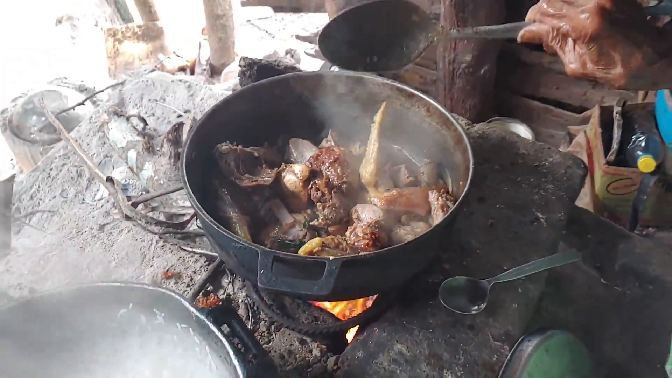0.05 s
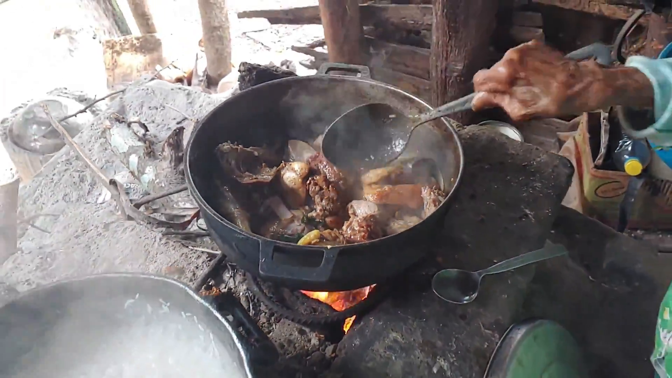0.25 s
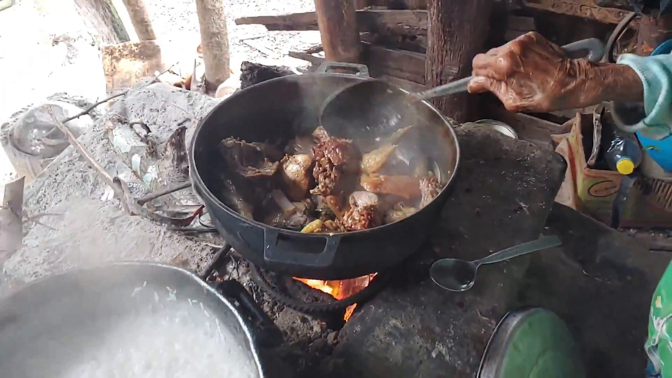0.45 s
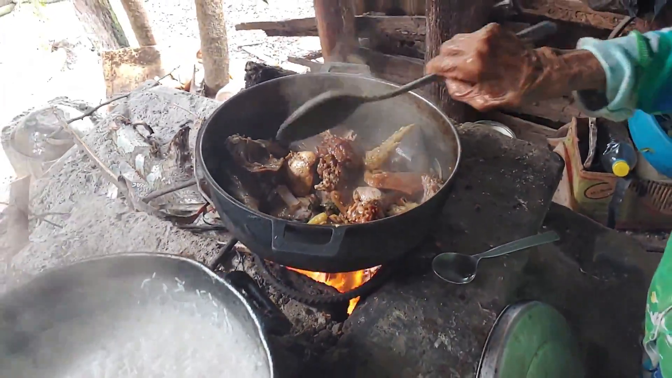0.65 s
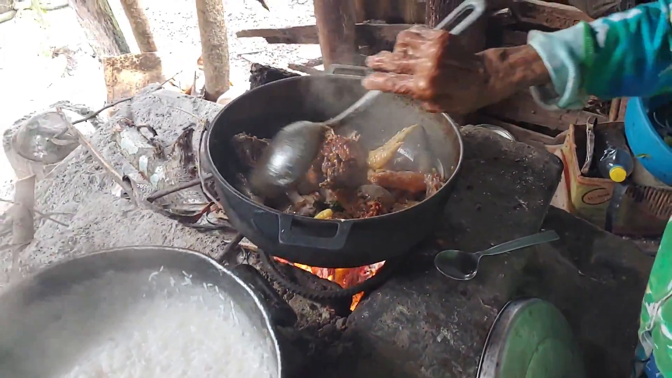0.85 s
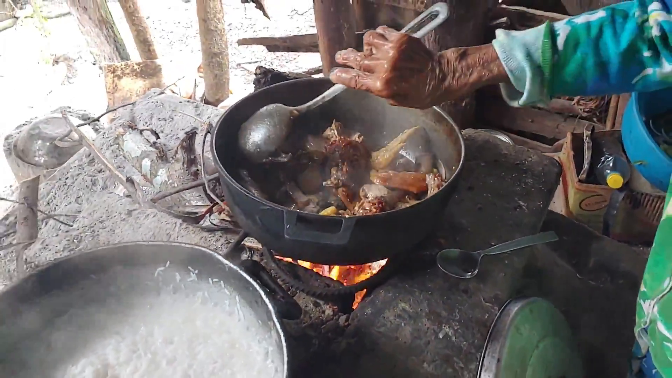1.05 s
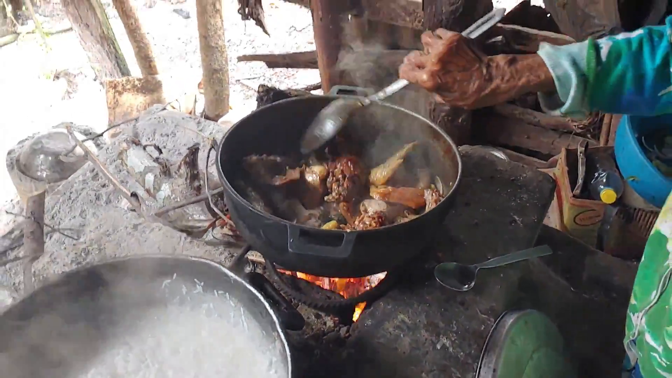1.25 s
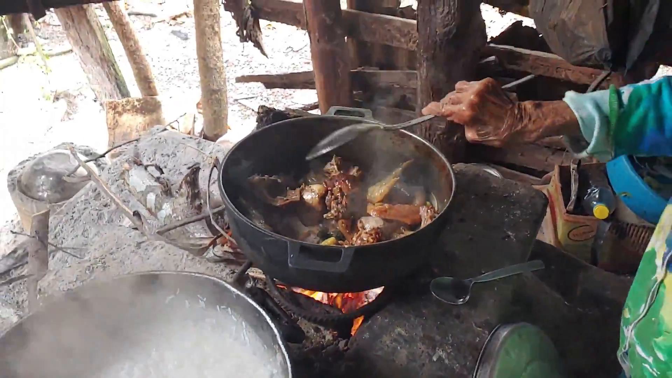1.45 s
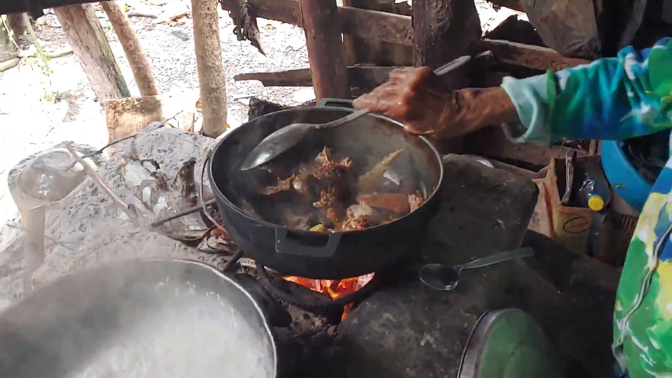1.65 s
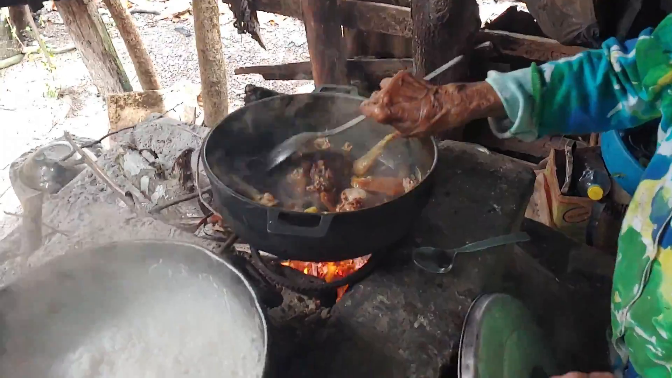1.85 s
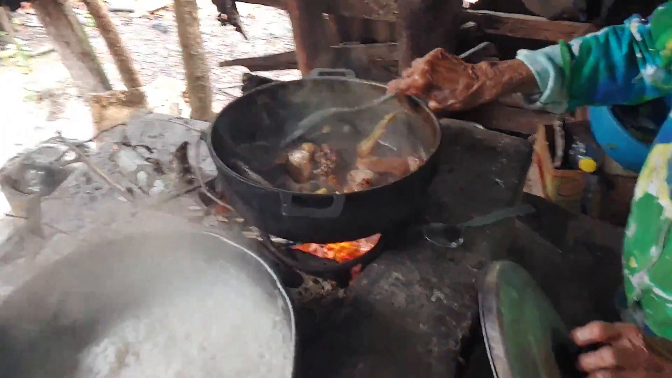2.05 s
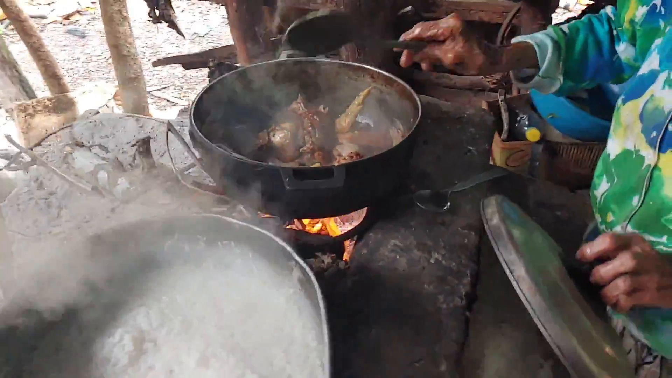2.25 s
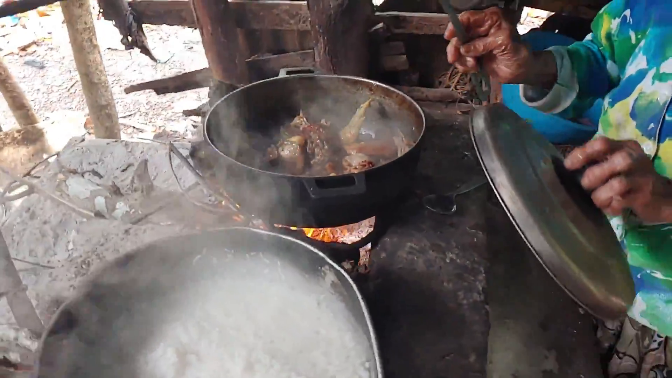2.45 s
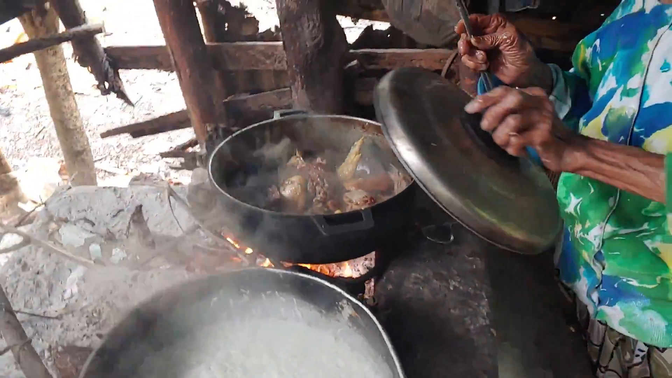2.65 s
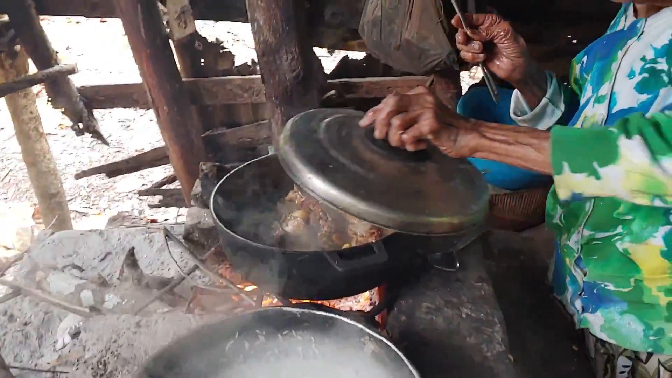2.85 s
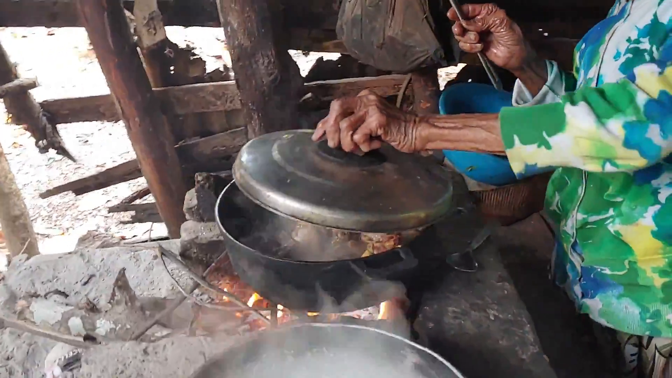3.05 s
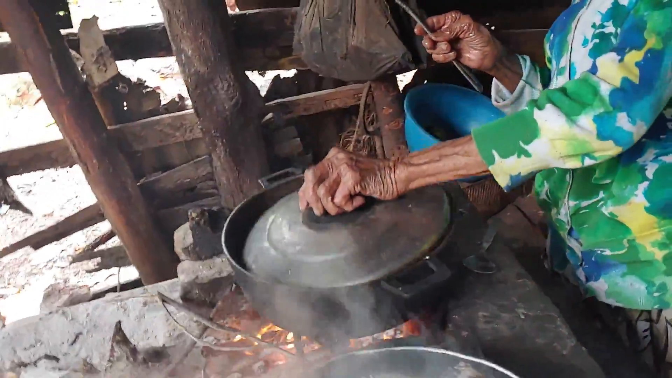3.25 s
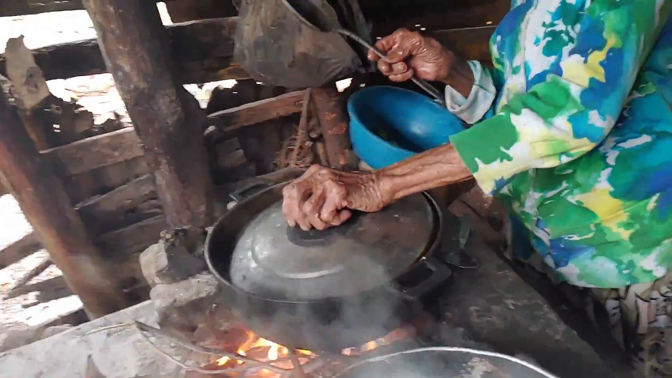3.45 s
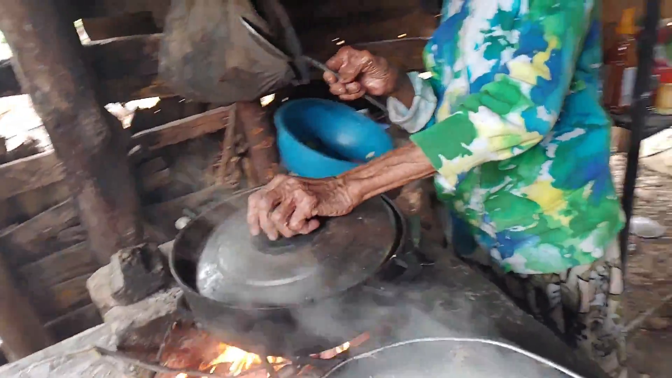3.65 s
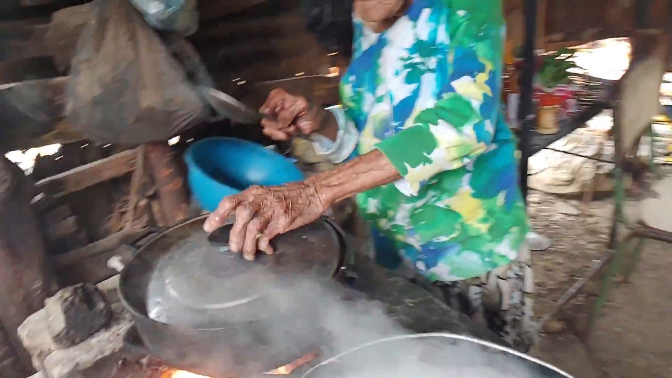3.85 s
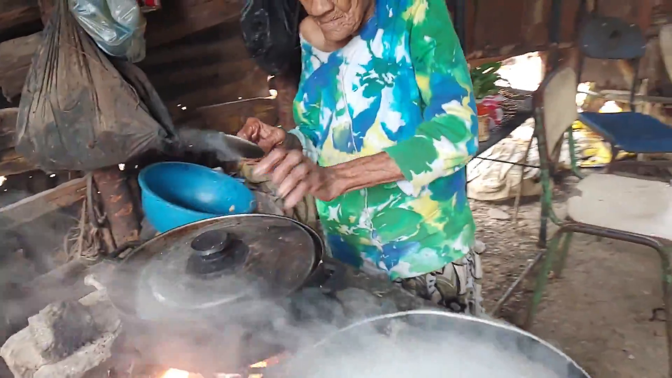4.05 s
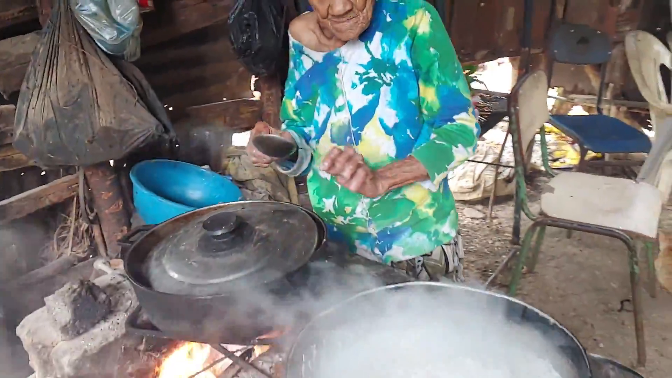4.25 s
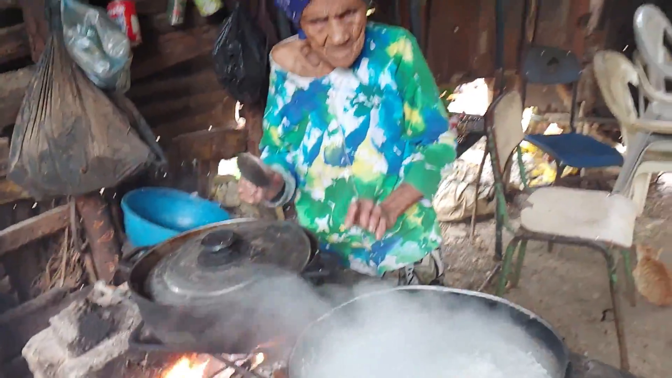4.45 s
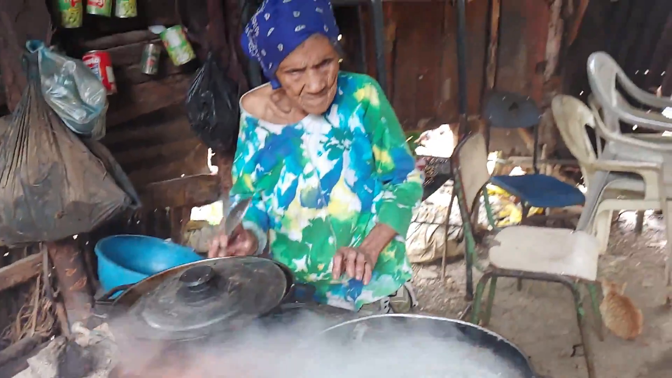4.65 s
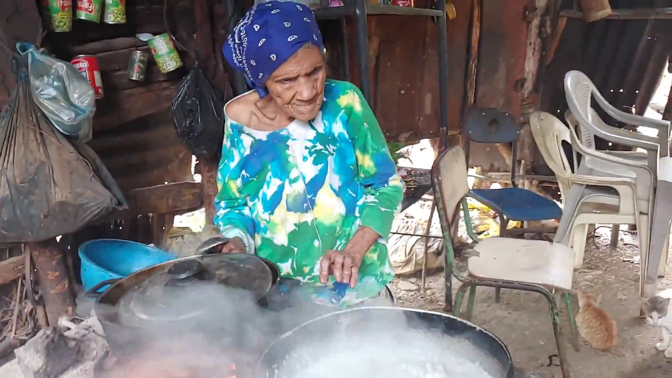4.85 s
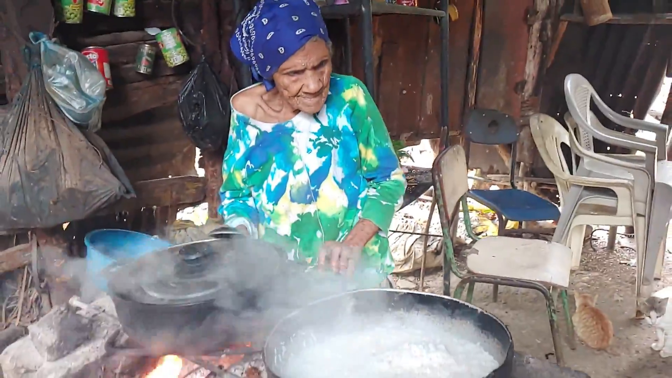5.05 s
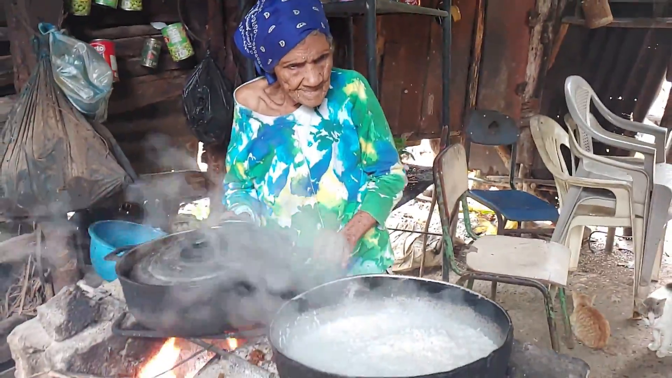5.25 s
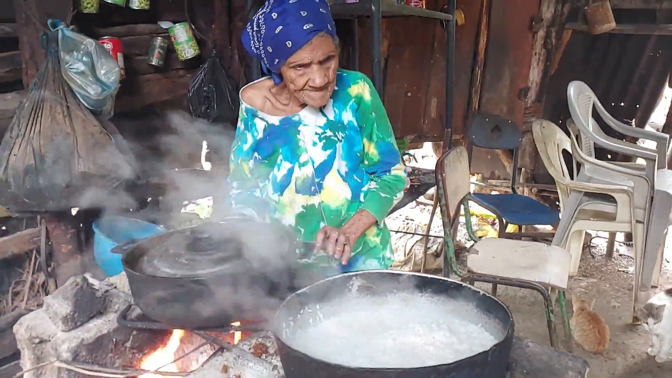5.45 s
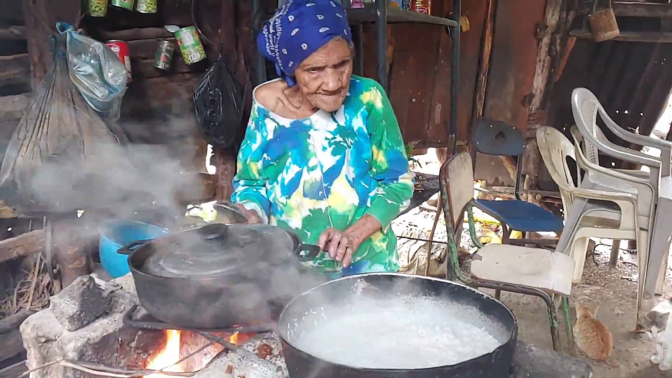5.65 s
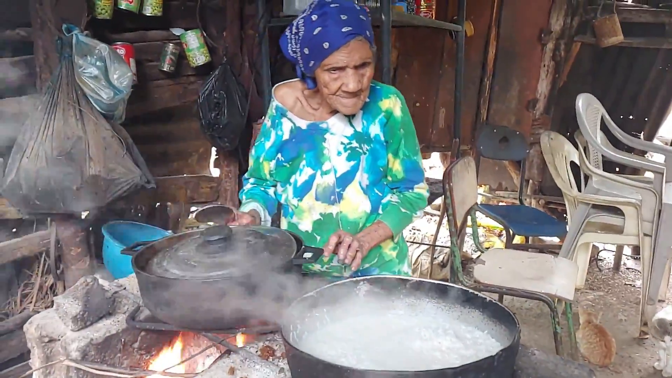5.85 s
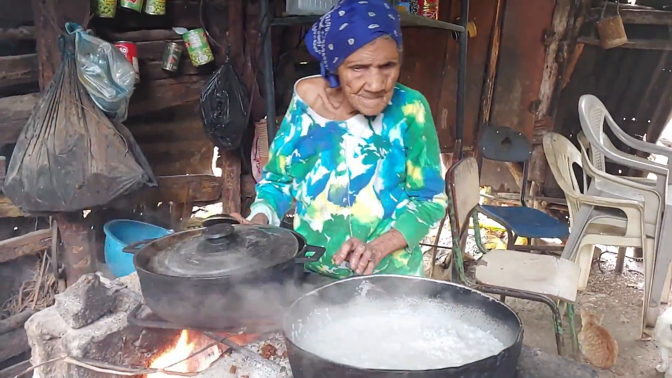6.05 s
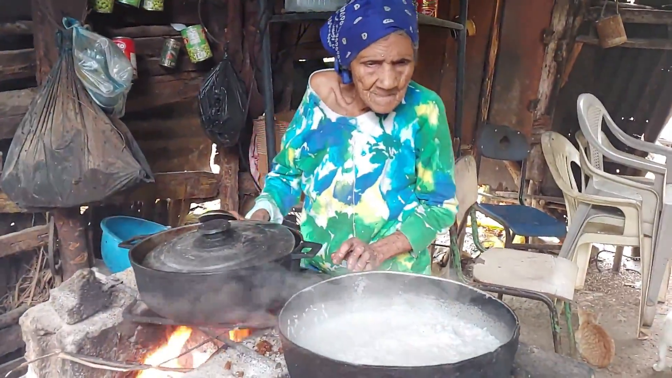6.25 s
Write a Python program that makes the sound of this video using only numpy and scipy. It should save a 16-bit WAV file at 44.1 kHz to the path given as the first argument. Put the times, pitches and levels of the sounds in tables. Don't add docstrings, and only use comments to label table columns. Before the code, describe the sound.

In a smoky open plank kitchen, a close handheld microphone hears low fire rumble, bubbling broth, fizzing fat and a faint hum. A spoon bumps dully in a full metal pot while a distant bird chirps. A heavy lid clatters down in quick bounces and grinds into place. Then the spoon knocks hard, clinks, drags with a brief moan and is laid down.

```python
import sys
import numpy as np
from scipy import signal
from scipy.fft import rfft, irfft, next_fast_len
from scipy.io import wavfile
from scipy.ndimage import uniform_filter1d, map_coordinates

SR = 44100
rng = np.random.default_rng(int(sys.argv[2]) if len(sys.argv) > 2 else 0)


def output_pcm(signal):
    pcm = np.clip(np.atleast_2d(signal).T, -1, 1) * 32767
    wavfile.write(sys.argv[1], SR, np.round(pcm).astype(np.int16))


def magnitude_from_level(level_db):
    exponent = np.asarray(level_db, float) / 20
    return 10 ** exponent


N = 278041

# f/Hz, level/dB, t60/s; the very short ones stand for the crowd of unresolved modes
POT_MODES = [
    [(194.4, 1.5, 0.073), (262, 0, 0.092), (310, 2.5, 0.15), (342, 5, 0.022)],
    [(730, 1, 0.06), (1106, -5, 0.074), (1308, -7, 0.53), (1407, -2, 0.066), (1497, -6.5, 0.13),
     (1630, -10, 0.1), (1920, -17, 0.16), (1200, 10, 0.0046)],
    [(2580, -9, 0.1), (2630, -4, 0.065), (3270, 2, 0.1), (3590, 2, 0.1), (3900, 26, 0.0014)],
    [(6412, 0, 0.1), (7100, 13, 0.08), (8850, -8, 0.097), (9300, -4, 0.052), (5200, 40, 0.002),
     (9500, 44, 0.0027)],
]
# f/Hz, level/dB, t60/s
HANDLE_MODES = [
    [(206, -7.5, 0.29), (301, -2, 0.094), (262, -17, 0.03)],
    [(900, -5, 0.085), (1120, -13, 0.11), (1244, -10.5, 0.11), (1567, -14, 0.13), (1100, 5, 0.0015)],
    [(2306, -1, 0.07), (3060, 8, 0.06), (3860, 1, 0.06), (4530, -4, 0.07), (3570, 24, 0.00082)],
    [(5243, 4, 0.094), (6090, 15, 0.059), (6840, 5.5, 0.19), (8543, -20, 0.25), (6080, -15, 0.00081),
     (9200, 27, 0.0017)],
]
# t/s, hold/s, pressure level/dB
DRAG_STROKES = [
    (5.319, 0.059, -49.5),
    (5.479, 0.0051, -50.5),
    (5.674, 0.013, -55),
]
# t/s, level/dB
BOIL_VIGOUR = [(0, -2), (1.2, 1), (2.6, 2), (3.5, 1), (4.6, 0), (5.4, 0), (6.3, 2)]


def unit(x):
    return x / np.sqrt(np.mean(x ** 2) + 1e-20)


def along(points, hz):
    f, v = np.transpose(points)
    return np.interp(np.log(hz + 1), np.log(f + 1), v)


def curves(rows):
    s, *cols = np.transpose(rows)
    return [np.interp(np.arange(N) / SR, s, c) for c in cols]


def wobble(rate):
    knots = rng.standard_normal(int(N * rate / SR) + 4)
    return map_coordinates(knots, [np.arange(N) * rate / SR])


def tone(hz):
    return np.sin(2 * np.pi * np.cumsum(hz) / SR)


def filtered(x, response):
    m = next_fast_len(x.shape[-1] + SR // 2)
    return irfft(rfft(x, m) * response(np.fft.rfftfreq(m, 1 / SR)), m)[..., :x.shape[-1]]


def swell(strokes, rise_db_s, fall_db_s):
    t = np.arange(N) / SR
    gain = 0
    for s, hold, db in strokes:
        early = np.maximum(s - t, 0)
        late = np.maximum(t - s - hold, 0)
        gain = gain + magnitude_from_level(db - rise_db_s * early - fall_db_s * late)
    return gain


def alternating(modes):
    return (-1.) ** np.arange(len(modes))


def ringing(force, modes, gains, damping=0):
    def response(f):
        soft = (1 + 1j * f / (1.3 * max(modes)[0])) ** -2
        total = 0
        for g, (c, db, t60) in zip(gains, modes):
            loss = np.log(1000) / np.pi * (1 / max(t60, 1e-4) + damping)
            total = total + g * magnitude_from_level(db) * 1j * f / (c * c - f * f + 1j * f * loss)
        return soft * total
    return filtered(force, response)


def contacts(rows, body, chatter, chatter_s, clink_db, scatter_db, damping):
    out, t = np.zeros(N + SR), np.arange(SR // 2) / SR
    push = 1. * (t == 0)
    for s, db, belly_db, hard_db in rows:
        for modes, part_db in zip(body, (belly_db, 0, hard_db, hard_db + clink_db)):
            rattle = chatter * rng.standard_normal(len(t)) * magnitude_from_level(-60 * t / max(chatter_s, .002))
            gains = magnitude_from_level(rng.normal(0, scatter_db, len(modes))) * alternating(modes)
            ring = ringing(push, modes, gains, damping) + ringing(rattle, modes, gains, damping + 35)
            out[round(s * SR):][:len(t)] += magnitude_from_level(db + part_db - 9.5) * ring / np.std(ring[:SR // 100])
    return out[:N]


def rubbing(pressure, body, parts_db, bumpy_db, damping):
    on = pressure > magnitude_from_level(-100)
    grit = (rng.standard_normal(N) * magnitude_from_level(bumpy_db * wobble(70)))[on]
    rub = 0
    for modes, db in zip(body, parts_db):
        rub = rub + magnitude_from_level(db) * unit(ringing(grit, modes, alternating(modes), damping))
    out = np.zeros(N)
    out[on] = pressure[on] * rub
    return out


def rush(spectrum, patchy_db, crackle, wide=6, long=10):
    # f/Hz, share of the power common to both ports (0..1)
    common_share = [(40, 0.73), (120, 0.99), (300, 0.85), (700, 0.53), (1500, 0.3), (4000, 0.072),
                    (10000, 0.067)]
    raw = rng.standard_normal((3, N))
    raw[0] += crackle * rng.exponential(1, N) * (rng.random(N) < 60 / SR)
    z = signal.stft(raw, nperseg=512)[2]
    field = uniform_filter1d(rng.standard_normal(z.shape[1:]), size=wide, axis=0)
    field = uniform_filter1d(field, size=long, axis=1)
    raw = signal.istft(z * magnitude_from_level(patchy_db * unit(field)), nperseg=512)[1][:, :N]

    def colour(hz):
        share = np.clip(along(common_share, hz), 0, 1)
        return magnitude_from_level(along(spectrum, hz)) * np.sqrt([share, 1 - share, 1 - share])

    same, left, right = filtered(raw, colour)
    return unit(np.array([same + left, same + right]))


def fire():
    # f/Hz, level/dB
    rumble = [(12, -62), (20, -13.5), (54, 2), (86, 0.5), (119, -6), (173, -15), (200, -3.5), (260, -75),
              (440, -120)]
    return magnitude_from_level(-49.5 + 4.5 * wobble(5.1)) * rush(rumble, patchy_db=0.8, crackle=.01)


def broth():
    # f/Hz, level/dB
    bubbling = [(88, -13), (150, 2.5), (172, -6.5), (334, -6), (563, -7.5), (770, -9), (1050, -10),
                (1750, -16.5), (2400, -22.5), (3120, -21.5), (5280, -120)]
    boil_db, = curves(BOIL_VIGOUR)
    return magnitude_from_level(-49 + boil_db + 0.077 * wobble(9)) * rush(bubbling, patchy_db=1.08, crackle=3.6)


def fat():
    # f/Hz, level/dB
    fizz = [(1200, -27), (2200, -8.5), (3500, 1), (4700, -2), (5400, -6.5), (6600, -0.5), (7500, -14),
            (9300, -6), (10500, -12.5), (11700, -22), (13000, -45), (15500, -45), (22000, -90)]
    boil_db, = curves(BOIL_VIGOUR)
    lid_on_s, muffle_db = 3.4, -2
    lid_db = muffle_db * (np.arange(N) / SR > lid_on_s)
    level_db = -57.5 + 0.24 * boil_db + lid_db + 0.19 * wobble(60)
    return magnitude_from_level(level_db) * rush(fizz, patchy_db=2.0, crackle=19.0, wide=40, long=2)


def motor():
    # t/s, f/Hz, level/dB
    drift = [(0, 111, -45.5), (.9, 110.6, -45.5), (1.3, 111, -51), (3.2, 112.2, -53), (5.1, 114, -53),
             (6.3, 115.5, -52)]
    hum_hz, hum_db = curves(drift)
    return magnitude_from_level(hum_db + 3 + 0.47 * wobble(1.8)) * tone(hum_hz + 1.46 * wobble(8))


def swish():
    # t/s, hold/s, level/dB
    swishes = [
        (.16, 0.049, -57.5),
        (.49, 0.018, -54.5),
    ]
    modes = [(4000, 5, 0.0038), (5200, -3, 0.0061), (6600, 9.5, 0.0028)]  # f/Hz, level/dB, t60/s
    return swell(swishes, 200, 170) * unit(ringing(rng.standard_normal(N), modes, (1, -1, 1)))


def stirring():
    # t/s, peak level/dB, belly share level/dB, edge share level/dB
    bumps = [(.302, -32, 2, -23), (.422, -43, -22, -4), (.437, -38.5, -19, -3.5), (.853, -42.5, -16, -3),
             (1.313, -37, -25, -11), (1.771, -29.5, -28, -11.5), (1.82, -30.5, -24, -27),
             (1.831, -44, -12, -8), (1.912, -52, -7, 8), (1.926, -46, -1, 8), (2.039, -53, -10, 6),
             (2.16, -46, -12, -10), (3.773, -33, 5.5, -25), (3.979, -44, -16, -21)]
    return contacts(bumps, POT_MODES, chatter=0.053, chatter_s=0.027, clink_db=-12, scatter_db=5.7, damping=90)


def bird():
    # t/s, f/Hz, level/dB, length/s
    chirps = [
        (1.195, 9700, -56, 0.052),
        (1.232, 9200, -62, 0.037),
    ]
    out, t = np.zeros(N), np.arange(N) / SR
    for s, hz, db, length in chirps:
        u = np.clip((t - s) / length, 0, 1)
        out += magnitude_from_level(db) * np.sin(np.pi * u) ** 2 * tone(hz * (1 - 0.038 * u))
    return out


def thuds():
    # t/s, f/Hz, peak level/dB, t60/s
    bumps = [
        (1.876, 74.4, -34.5, 0.23),
        (2.114, 166, -24.5, 0.059),
        (2.131, 280, -31.5, 0.049),
        (6.27, 266, -37.5, 0.14),
    ]
    out = 0
    for s, hz, db, t60 in bumps:
        age = np.maximum(np.arange(N) / SR - s, 0)
        out = out + magnitude_from_level(db - 60 * age / t60) * np.sin(2 * np.pi * hz * age)
    return out


def wall_scrape():
    # t/s, hold/s, pressure level/dB
    strokes = [
        (1.9, 0.013, -67),
        (1.93, 0.0056, -49),
    ]
    return rubbing(swell(strokes, 1000, 760), POT_MODES, parts_db=(11, -3, 0.5, -1.0), bumpy_db=4.5, damping=210)


def lid():
    # f/Hz, level/dB, t60/s
    lid_modes = [
        [(296, -14, 0.096), (447, 4.5, 0.11), (332, 11.5, 0.0095)],
        [(690, 6.5, 0.024), (958, 6.5, .04), (1203, -1, 0.21), (1280, -7, 0.43), (1408, 5, 0.069),
         (1653, -3, 0.07), (1755, 6, 0.09), (2060, -15, 0.49), (1230, 16.5, 0.0035)],
        [(2393, -7, 0.084), (2700, 1, 0.045), (2800, 1, 0.072), (3130, 12.5, 0.02), (3500, -8, 0.2),
         (3760, 0, 0.09), (3050, 28.5, 0.00063)],
        [(4780, 0, 0.045), (5400, -25, 0.034), (6550, 1, 0.06), (6200, 23.5, 0.00053), (9200, 20.5, 0.0023)],
    ]
    # t/s, peak level/dB, belly share level/dB, edge share level/dB
    bounces = [(3.174, -11.5, -8, -6.5), (3.179, -11, -20, -20), (3.214, -13.5, -3, -18),
               (3.2695, -5, -3.5, -13.5), (3.286, -17, -2, -16), (3.321, -15, -14, -8.5),
               (3.339, -15, -14.5, -26), (3.364, -22.5, -12, -6.5)]
    # t/s, hold/s, pressure level/dB
    grind = [
        (3.29, 0.093, -29),
    ]
    clatter = contacts(bounces, lid_modes, chatter=0.12, chatter_s=0.035, clink_db=-9.5, scatter_db=2.5,
                       damping=0.51)
    return clatter + rubbing(swell(grind, 810, 430), lid_modes, parts_db=(-1.5, -3.5, -13.5, -38),
                             bumpy_db=0.5, damping=14.0)


def knocking():
    # t/s, peak level/dB, belly share level/dB, edge share level/dB
    knocks = [
        (4.806, -6.5, -3, -8),
        (4.87, -36, 12.5, 2),
        (4.913, -26.5, 1.5, -15),
        (5.492, -38.5, 2, -3),
        (5.673, -34.5, -13, -21),
    ]
    return contacts(knocks, POT_MODES, chatter=0.07, chatter_s=0.12, clink_db=-6, scatter_db=5.0, damping=0.71)


def spoon_clink():
    # f/Hz, level/dB, t60/s
    spoon_modes = [
        [(230.2, -6, 0.079), (290, 10, 0.029), (280, 3.5, 0.0071)],
        [(1091, -18, 0.23), (1250, 3, 0.068), (1480, -13, 0.2), (2020, -10, 0.16), (1150, 23.5, 0.00063)],
        [(2950, 7, 0.061), (3160, -19, 0.052), (3390, -15, 0.12), (3750, 9, 0.12), (4570, -1, 0.055),
         (3880, 31, 0.0017)],
        [(6045, 9.5, 0.13), (6230, 1.5, 0.064), (6600, -6, 0.25), (8700, 12.5, 0.031), (10250, -2, 0.11),
         (11730, -2, 0.064), (5800, -16, 0.0013), (9200, -10, 0.0017)],
    ]
    # t/s, peak level/dB, belly share level/dB, edge share level/dB
    clinks = [
        (4.978, -20.5, 5, 8.5),
        (4.991, -21.5, -5.5, -13),
        (5.009, -28, 5, -6),
    ]
    return contacts(clinks, spoon_modes, chatter=0.066, chatter_s=0.12, clink_db=-1.5, scatter_db=3.0, damping=1.5)


def moan():
    spread_s = 0.021
    moan_hz, moan_db = 267.4, 13.5
    strokes = []
    for (s, hold, db), start_db in zip(DRAG_STROKES, [0.5, -3.5, -4]):
        strokes.append((s - spread_s, hold + 2 * spread_s, db + moan_db + start_db))
    pressure = swell(strokes, 215, 260)
    edge = unit(ringing(rng.standard_normal(N), [(3060, 0, .04)], (1,)))
    out = swell(DRAG_STROKES, 470, 400) * magnitude_from_level(-3.5) * edge
    for ratio, level_db in [(.8, -5.5), (.98, -0.6), (1.17, -4)]:
        level = magnitude_from_level(level_db + 1.1 * wobble(60))
        out = out + pressure * level * tone(moan_hz * (ratio + 0.091 * wobble(60)))
    return out


def spoon_drag():
    return rubbing(swell(DRAG_STROKES, 260, 450), HANDLE_MODES, parts_db=(5.5, 1, -2, -13.5),
                   bumpy_db=5.5, damping=14.0)


def lay_down():
    # t/s, peak level/dB, belly share level/dB, edge share level/dB
    taps = [
        (6.051, -28, 10, 2),
        (6.057, -24.5, 1.9, 9.7),
        (6.065, -24, 6.4, 2.9),
    ]
    return contacts(taps, HANDLE_MODES, chatter=0.091, chatter_s=0.077, clink_db=-6.5, scatter_db=2.5, damping=1.9)


def steam():
    # t/s, hold/s, level/dB
    whistle = [
        (6.16, .3, -53),
    ]
    return swell(whistle, 400, 400) * magnitude_from_level(1.7 * wobble(30)) * tone(790 + 6 * wobble(22))


def shack(x):
    # f/Hz, t60/s
    decay = [(200, 0.077), (2000, 0.14), (10000, 0.11)]
    # f/Hz, level/dB
    colour = [(150, -28), (800, -6), (20000, -9)]
    hz, t, z = signal.stft(rng.standard_normal((2, SR // 3)), SR, nperseg=256)
    fade_db = along(colour, hz)[:, None] - 60 * t / along(decay, hz)[:, None]
    tail = signal.istft(z * magnitude_from_level(fade_db), SR, nperseg=256)[1]
    delayed = np.pad(x, (150, 0))[None]
    return signal.fftconvolve(delayed, tail / np.linalg.norm(tail[0]), axes=1)[:, :N]


def scene():
    # t/s, lead of the left port/ms
    lead = [(0, .19), (1.7, 0.099), (2.2, 0.13), (2.9, 0.14), (3.2, .036), (4.3, 0.012), (4.7, 0.12),
            (6.3, 0.14)]
    hearth = fire() + broth() + fat() + motor() + swish() + steam()
    metal = stirring() + thuds() + wall_scrape() + lid() + knocking() + spoon_clink()
    metal += moan() + spoon_drag() + lay_down()
    both = metal * magnitude_from_level([[-.3], [.3]]) + magnitude_from_level(-3.0) * shack(metal)
    both = both + (hearth + bird()) * magnitude_from_level([[-.4], [.4]])
    late = np.arange(N) - curves(lead)[0] * SR / 1000
    return np.array([both[0], map_coordinates(both[1], [late], mode="nearest")])


def low_pass(x):
    return signal.sosfilt(signal.butter(12, 12680, fs=SR, output="sos"), x)


def record(dry):
    # f/Hz, level/dB
    mic = [(20, 2), (11500, 0.5), (12300, -10), (13000, -14), (15300, -5), (16000, -50), (22050, -60)]
    squeezed = dry / (1 + np.abs(dry / 1.05) ** 4) ** (1 / 4)
    mix = filtered(squeezed, lambda hz: magnitude_from_level(along(mic, hz)))
    return low_pass(mix)


dry = scene()
out = record(dry)
output_pcm(out)
```